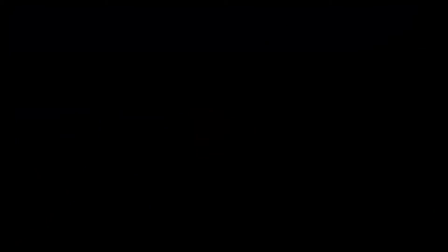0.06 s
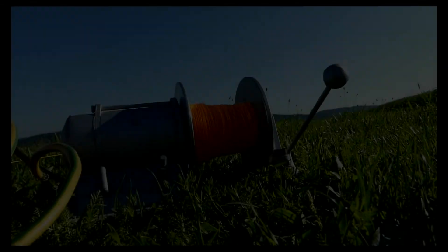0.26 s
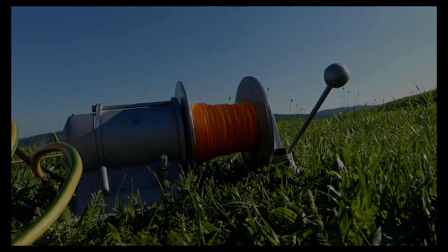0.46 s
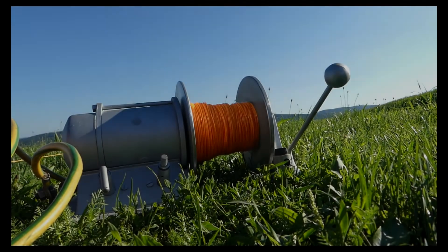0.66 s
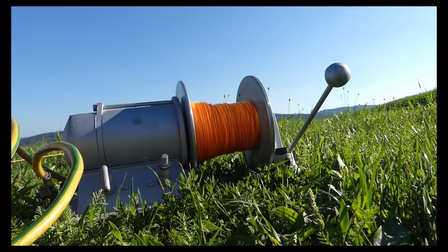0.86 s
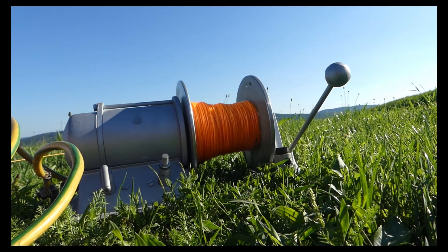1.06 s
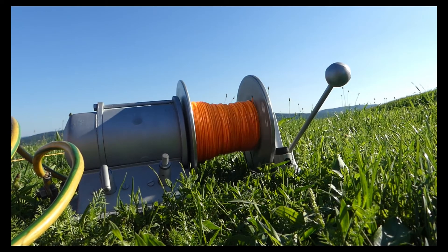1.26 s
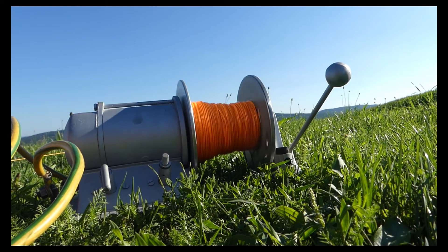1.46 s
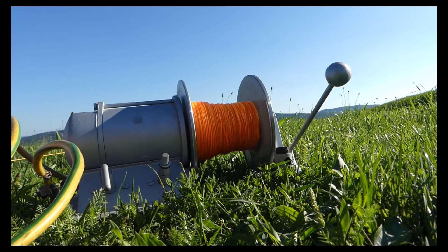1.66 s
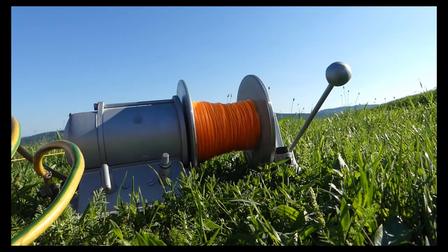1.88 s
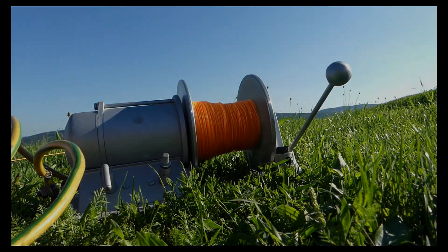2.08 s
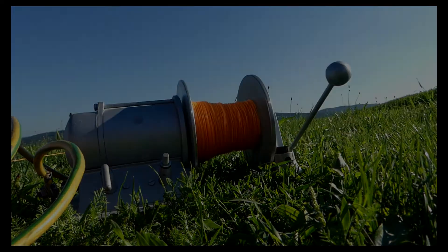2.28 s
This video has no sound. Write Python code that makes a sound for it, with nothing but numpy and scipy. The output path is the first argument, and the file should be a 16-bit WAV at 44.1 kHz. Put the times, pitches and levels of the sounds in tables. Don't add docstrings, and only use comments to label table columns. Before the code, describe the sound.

An electric winch whirs steadily with gritty metallic ringing, line ticks and low wind puffs outdoors

```python
import sys
import numpy as np
from scipy import signal
from scipy.io import wavfile

SR = 44100
rng = np.random.default_rng(int(sys.argv[2]) if len(sys.argv) > 2 else 0)


def magnitude_from_level(level_db):
    exponent = np.asarray(level_db, float) / 20
    return 10 ** exponent


def master(y):
    cut = np.clip(np.atleast_2d(y).T, -1, 1)
    pcm = np.round(cut * 32767)
    wavfile.write(sys.argv[1], SR, pcm.astype(np.int16))


N = 102532
T = np.arange(N) / SR
TURNS_PER_S, TURN_ZERO_S = 10.5, 1.19
LOW_CUT_HZ = 58.4


def rms_one(x):
    return x / np.sqrt(np.mean(x ** 2) + 1e-20)


def in_time(rows):
    return np.interp(T, *np.transpose(rows))


def at_hz(points, hz):
    points_hz, values = np.transpose(points)
    return np.interp(np.log(hz), np.log(points_hz), values)


def drift(rate_hz):
    r = np.exp(-80 * np.pi * rate_hz / SR)
    slow = signal.lfilter([1], [1, -2 * r, r * r], rng.standard_normal(N // 40 + 2002))[2000:]
    return np.interp(np.arange(N) / 40, np.arange(len(slow)), rms_one(slow))


def cut(x, hz, kind, order=2):
    return signal.sosfilt(signal.butter(order, hz, kind, fs=SR, output="sos"), x)


def resonate(x, hz, width_hz):
    r = np.exp(-np.pi * width_hz / SR)
    top = np.array([1, 0, -1]) * (1 - r * r) / 2
    return signal.lfilter(top, [1, -2 * r * np.cos(2 * np.pi * hz / SR), r * r], x)


def stereo(mid, side):
    return mid + side * np.array([[1], [-1]])


def pan(left_minus_right_db):
    return magnitude_from_level(left_minus_right_db * np.array([[.5], [-.5]]))


# pitch_hz [Hz], left_minus_right_db [dB]
LEAN = [(60, 7), (180, 7), (550, 6), (1650, 2.5), (4970, 2.5), (15000, -4)]


def lean(hz):
    return pan(at_hz(LEAN, hz))


def throb(depth_db, lag_turns, per_turn=1):
    turns = (T - TURN_ZERO_S) * TURNS_PER_S - lag_turns
    return magnitude_from_level(depth_db * np.cos(2 * np.pi * per_turn * turns))


def puff(s, db, hz, pan_db, width_cycles):
    t = T - s
    swell = np.exp(-.5 * (t * hz / width_cycles) ** 2)
    return magnitude_from_level(db) * pan(pan_db) * swell * np.cos(2 * np.pi * hz * t)


# time_s [s], level_db [dB]
GUST = [(0.1, -48.5), (0.17, -27.5), (0.29, -36.5), (0.33, -41.5), (0.58, -36), (0.64, -45.5),
        (0.79, -23.5), (0.84, -58), (0.88, -34), (1.08, -50), (1.11, -43), (1.17, -42.5), (1.53, -43.5),
        (1.56, -42), (1.6, -58), (2.06, -51), (2.13, -38.5), (2.32, -57)]


def turbulence():
    mid, side = rng.standard_normal((2, N))
    mid = rms_one(cut(cut(mid, 150, "low"), LOW_CUT_HZ, "high"))
    side = rms_one(cut(cut(side, 290, "low"), LOW_CUT_HZ, "high"))
    lumpy_db = -1.5
    side = side * magnitude_from_level(lumpy_db * drift(38))
    level_db = .71 * (in_time(GUST) + 34) - 38
    return magnitude_from_level(level_db + lumpy_db * drift(60)) * stereo(mid, .69 * side)


# middle_s [s], level_db [dB], pitch_hz [Hz], left_minus_right_db [dB]
PUFFS = [(0.165, -17, 161, 4), (0.187, -39, 180.0, -3), (0.204, -25.5, 150, -7), (0.224, -31, 140, -8),
         (0.239, -22.5, 125, 3), (0.258, -25, 157, -2), (0.283, -25, 150.0, -3), (0.302, -24.5, 153, 0),
         (0.445, -29.5, 120, 0), (0.495, -25.5, 150.0, -1), (0.528, -23, 167, -5), (0.539, -20.5, 109, 2),
         (0.558, -24.5, 109, 0), (0.578, -20.5, 130, 3), (0.699, -27, 140.0, 0), (0.723, -24, 200.0, -3),
         (0.736, -42, 210.0, -5), (0.753, -25.5, 129, -6), (0.781, -15.5, 167, -1), (0.885, -24.5, 172, -1),
         (0.924, -25, 174, 2), (1.023, -32, 140.0, -5), (1.104, -29, 150, -7), (1.115, -24.5, 107, 0),
         (1.432, -31, 171, -6), (1.443, -24, 139, -3), (1.538, -33, 153, -4), (1.558, -25.5, 136, 2),
         (2.124, -25, 216, -12)]


def puffs():
    out = np.zeros((2, N))
    for (s, db, hz, pan_db), sign in zip(PUFFS, rng.choice([-1, 1], len(PUFFS))):
        out += sign * puff(s, db, hz, pan_db, .31)
    return out


# middle_s [s], level_db [dB], pitch_hz [Hz], left_minus_right_db [dB]
FLICKS = [
    (.2015, -23, 440, -15),
    (.225, -27, 330, -11),
    (.547, -25, 310, -14),
    (.574, -30, 470, -12),
    (.717, -29, 290, -8),
    (.775, -22, 330, -11),
]


def flicks():
    return sum(puff(s + .004, db - 2, hz, pan_db, .55) for s, db, hz, pan_db in FLICKS)


SQUEAL_HZ = 1520, 3390, 5700
# middle_s [s], low_db [dB], middle_db [dB], high_db [dB], half_length_s [s]
SQUEAL = [
    (2.001, -50, -40, -37, .005),
    (2.013, -50, -28, -31, .005),
    (2.027, -50, -40, -34, .006),
    (2.041, -50, -42, -34, .006),
    (2.061, -36, -31, -32, .004),
    (2.072, -50, -38, -38, .005),
    (2.082, -50, -26, -36, .0055),
]


def squeal():
    out = 0
    for k, hz in enumerate(SQUEAL_HZ):
        swell = 0
        for row in SQUEAL:
            swell = swell + magnitude_from_level(row[1 + k]) * np.exp(-.5 * ((T - row[0]) / row[-1]) ** 2)
        out = out + swell * magnitude_from_level(drift(40)) * np.sin(2 * np.pi * hz * T + .5 * drift(40))
    return out


def snap_burst(t, db, hz, half_length_s, phase):
    return magnitude_from_level(db) * np.exp(-.5 * (t / half_length_s) ** 2) * np.cos(2 * np.pi * hz * t + phase)


# time_s [s], bright_db [dB], knock_db [dB]
TICKS = [(0.098, -15, -21), (0.1426, -11, -11), (0.1576, -13, -15), (0.1651, -13, -25), (0.201, -16, -19),
         (0.2991, -14, -18), (0.3349, -6, -21), (0.501, -9, -22), (0.5228, -12, -26), (0.8218, -8, -32),
         (0.9272, -11, -24), (0.9555, -5, -24), (0.9842, -15, -29), (1.1024, -7, -19), (1.2703, -7, -22),
         (1.2868, -10, -23), (1.3155, -5, -20), (1.3374, -11, -17), (1.3761, -15, -28), (1.669, -9, -19),
         (1.7075, -10, -21), (1.7153, -7, -26), (1.7429, -8, -21), (1.8091, -6, -21), (1.9745, -12, -27),
         (1.9841, -15, -28), (2.0307, -9, -12), (2.0462, -11, -16), (2.0556, -12, -22), (2.0757, -5, -23),
         (0.0895, -16, -27), (0.228, -19, -22), (0.5654, -19, -28), (0.7638, -21, -35), (1.2637, -22, -24),
         (1.7067, -12, -28), (1.7919, -20, -30), (1.8012, -19, -30), (1.8976, -20, -28), (1.9552, -17, -25),
         (2.1827, -23, -35)]


def ticks():
    snap, spray = np.zeros(N), np.zeros(N)
    scatter, ground_s, spray_s = .04, .0022, .0036
    for (s, bright_db, knock_db), (a, b, c) in zip(TICKS, rng.normal(0, 1, (len(TICKS), 3))):
        near = slice(int((s - .002) * SR), int((s + .03) * SR))
        t = T[near] - s
        snap[near] += snap_burst(t, bright_db, 11700 * (1 + scatter * a), .00011, 2 * c)
        snap[near] += snap_burst(t, knock_db, 5300 * (1 + scatter * b), .00015, -2 * c)
        spray[near] += magnitude_from_level(bright_db - 14) * (t > 0) * np.exp(-(t / spray_s) ** 2)
    snap = snap + magnitude_from_level(-10) * np.interp(T - ground_s, T, snap)
    mid, side = cut(rng.standard_normal((2, N)), [7500, 16000], "band")
    return magnitude_from_level(3) * pan(-1.3) * (snap + spray * stereo(mid, .52 * side))


# pitch_hz [Hz], level_db [dB per Hz]
RUB = [(170, -5), (500, -10), (1300, -9.5), (2350, -7.5), (5000, -6), (8000, -11.5), (10500, -15.5),
       (15500, -12)]
# pitch_hz [Hz], likeness [0 to 1]
LIKENESS = [(60, 0.46), (240, 0.69), (950, 0.78), (3770, 0.64), (15000, 0.07)]


def rubbing():
    out, together = 0, drift(9)
    edges_hz = 141 * 2 ** np.arange(0, 7.1, .5)
    white = rng.standard_normal((2, 2, N))
    for k, (low, high) in enumerate(zip(edges_hz, edges_hz[1:])):
        mid, side = cut(white[k % 2], [low, high], "band")
        hz = np.sqrt(low * high)
        alike = at_hz(LIKENESS, hz)
        flicker_db = .9 * (1.26 * together + drift(34))
        both = stereo(np.sqrt(1 + alike) * mid, np.sqrt(1 - alike) * side)
        out = out + magnitude_from_level(at_hz(RUB, hz) + flicker_db) * lean(hz) * both
    return magnitude_from_level(1) * throb(.55, 0) * rms_one(out)


def grit():
    sizes = magnitude_from_level(3.5 * np.minimum(rng.exponential(1, (2, N)), 5)) * rng.choice([-1, 1], (2, N))
    mid, side = sizes * (rng.random((2, N)) < 5000 / SR)
    return stereo(mid, .46 * side)


def end_cap(contacts):
    hz, width_hz = 5120, 95
    return magnitude_from_level(1) * throb(1.5, -.03, per_turn=2) * lean(hz) * resonate(contacts, hz, width_hz)


HOUSING_HZ = [672, 942, 1800, 2860, 2985, 3390, 4685, 5672, 7000, 9120, 9950, 10820, 11370, 11890]
# width_hz [Hz], level_db [dB], throb_db [dB], throb_lag [turns]
HOUSING = [(74, -4, -1, 0), (45.4, 0, 3, -0.18), (214, -8, -2, -0.27), (100, -5, 5, -0.04),
           (89, -7, 7, 0.03), (60, -9, 3, -0.03), (110, -2, 2.5, -0.2), (80, -10, 6, 0), (170, -6, 6, 0.02),
           (75, 2, 4.5, -0.31), (130, -4, 2, -0.13), (60, -3, 2, 0), (90, -5, 3.5, -0.1), (70, -9, 3.5, 0)]


def housing():
    contacts = grit()
    out = end_cap(contacts)
    for k, (hz, (width_hz, db, depth_db, lag)) in enumerate(zip(HOUSING_HZ, HOUSING)):
        gain = (-1) ** k * magnitude_from_level(db + .8 * drift(29))
        out += gain * throb(depth_db, lag) * lean(hz) * resonate(contacts, hz, width_hz)
    return magnitude_from_level(3.5) * rms_one(out)


# time_s [s], level_db [dB]
LOAD = [(.07, -39.5), (.3, -43.5), (.5, -40), (.7, -41.5), (.9, -40.5), (1.1, -39.5), (1.3, -39.5),
        (1.5, -40.5), (1.7, -40), (1.9, -38.5), (2.1, -40), (2.32, -39)]


def scene():
    winch = magnitude_from_level(in_time(LOAD) + 6.5) * (housing() + rubbing())
    line = ticks() + squeal()
    wind = turbulence() + puffs() + flicks()
    return winch + line + wind


def microphone(dry):
    cavity = magnitude_from_level(-3) * resonate(dry, 120, 28)
    return cut(dry + cavity, LOW_CUT_HZ, "high", order=4)


def duck(x):
    limit_db, share, release_db_per_s = -15.5, .13, 136
    over_db = np.maximum(20 * np.log10(np.abs(x).max(axis=0) + 1e-9) - limit_db, 0)
    release_db = release_db_per_s * T
    held_db = np.maximum.accumulate(over_db + release_db) - release_db
    return x * magnitude_from_level(-share * signal.lfilter([.003], [1, -.997], held_db))


# middle_s [s], half_length_s [s], level_db [dB]
SAGS = [(.347, .009, -7), (.68, .015, -5), (.79, .012, -4), (.838, .012, -6), (1.116, .011, -7),
        (1.232, .012, -5), (1.41, .025, -4), (1.612, .012, -4), (1.726, .004, -5), (1.78, .008, -4),
        (1.821, .009, -16), (1.85, .02, -4), (2.145, .018, -5)]


def treble_sags(x):
    sag_db = sum(db * np.exp(-.5 * ((T - s) / half) ** 4) for s, half, db in SAGS)
    low = signal.sosfiltfilt(signal.butter(4, 6000, fs=SR, output="sos"), x)
    return low + magnitude_from_level(sag_db) * (x - low)


def roll_off(x):
    return signal.sosfilt(signal.butter(12, 16500, fs=SR, output="sos"), x)


def record(dry):
    x = microphone(dry) * (T > .0722)
    x = treble_sags(duck(x))
    x = signal.sosfilt(signal.cheby2(8, 34, 16250, fs=SR, output="sos"), x)
    return roll_off(x)


dry = scene()
out = record(dry)
master(out)
```